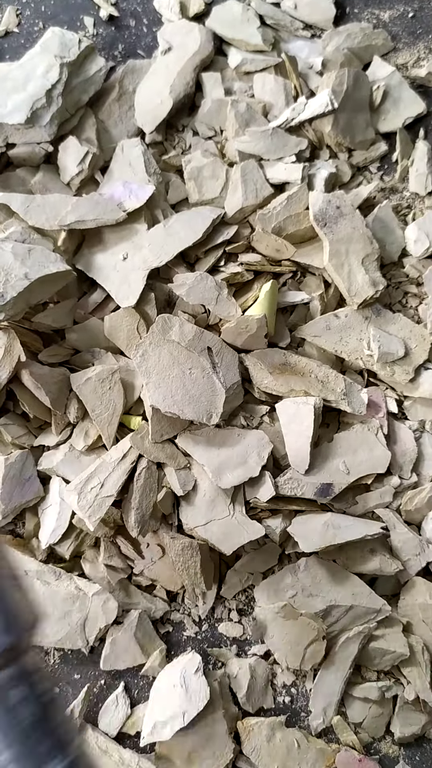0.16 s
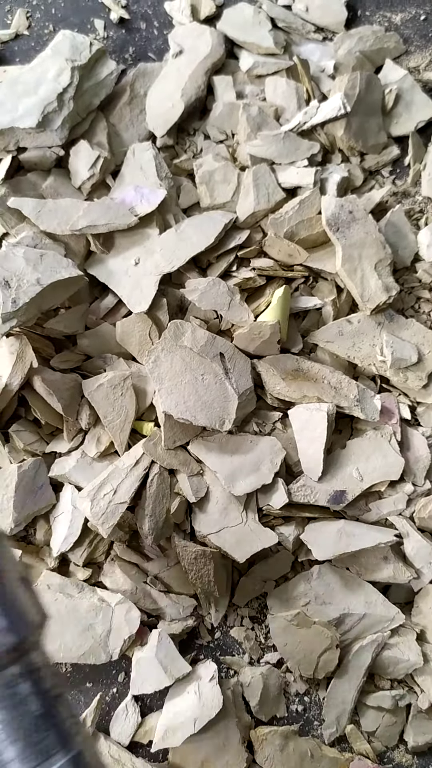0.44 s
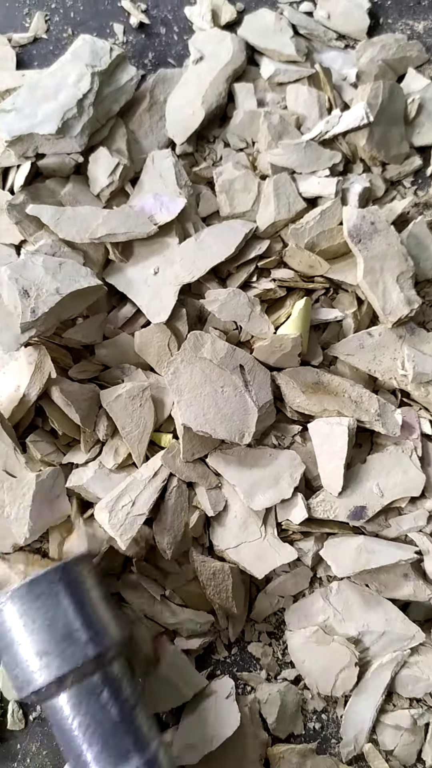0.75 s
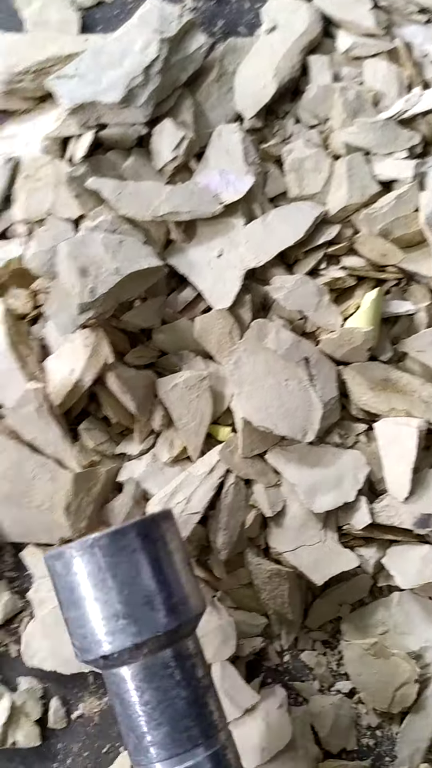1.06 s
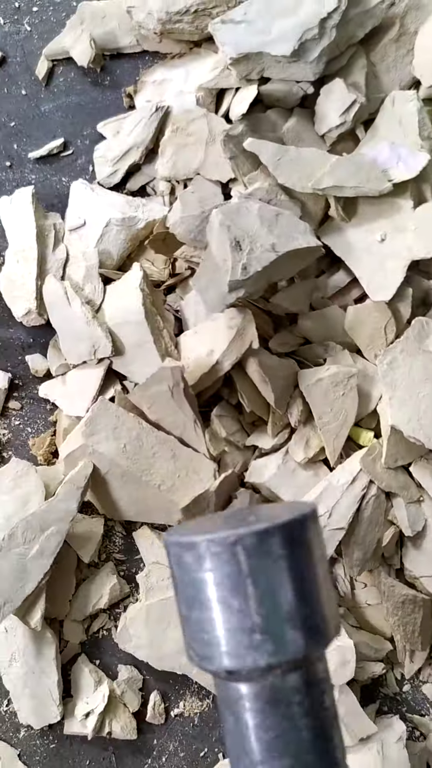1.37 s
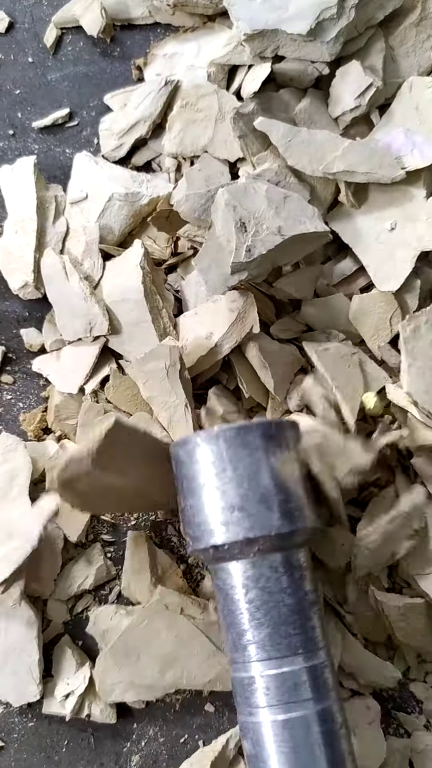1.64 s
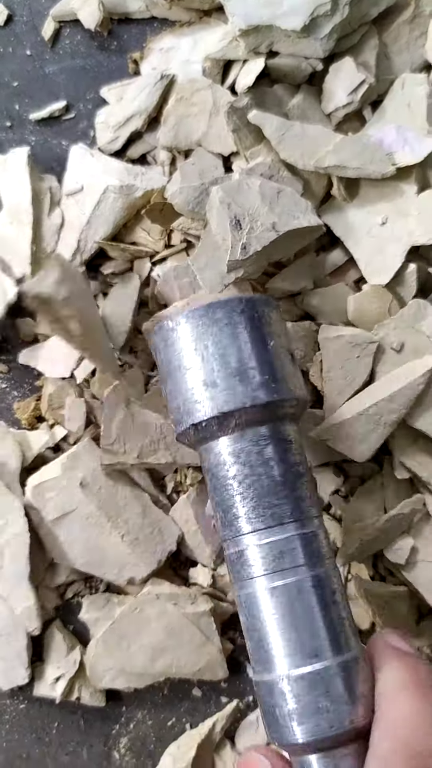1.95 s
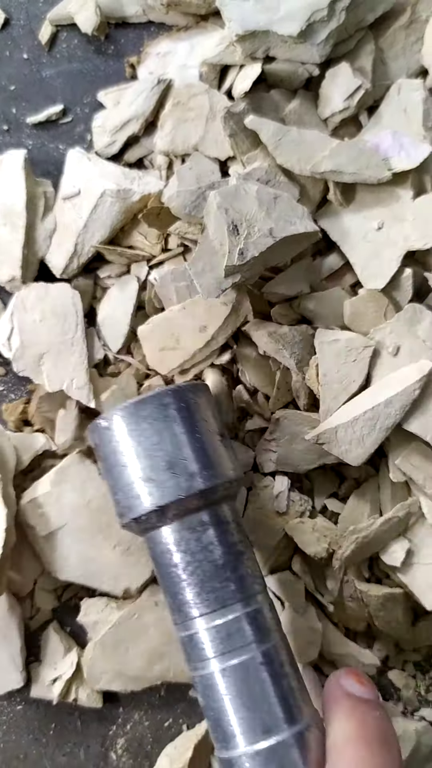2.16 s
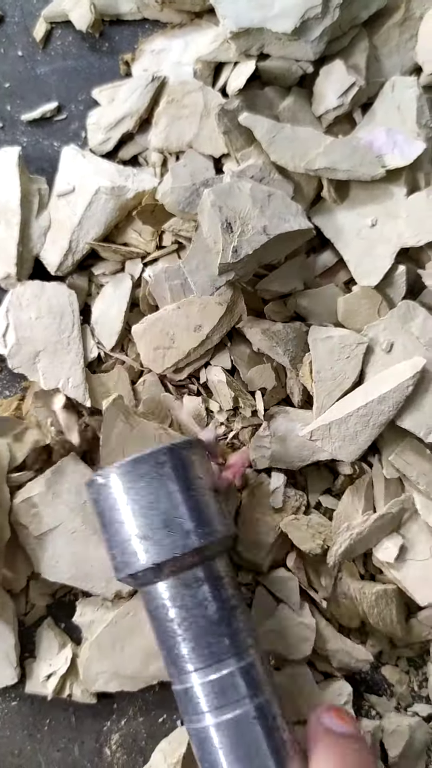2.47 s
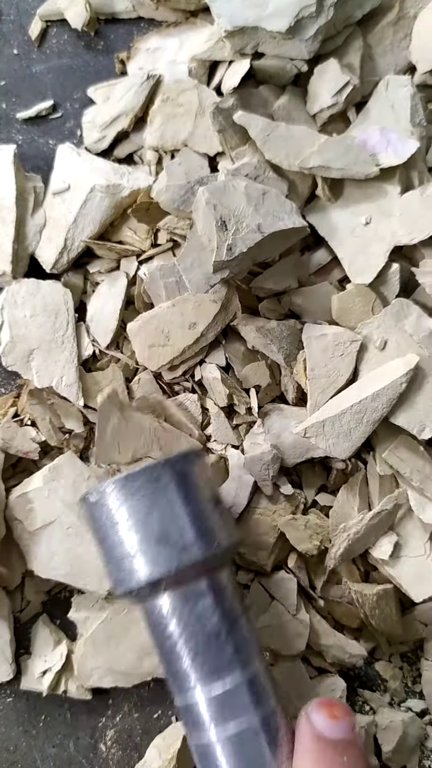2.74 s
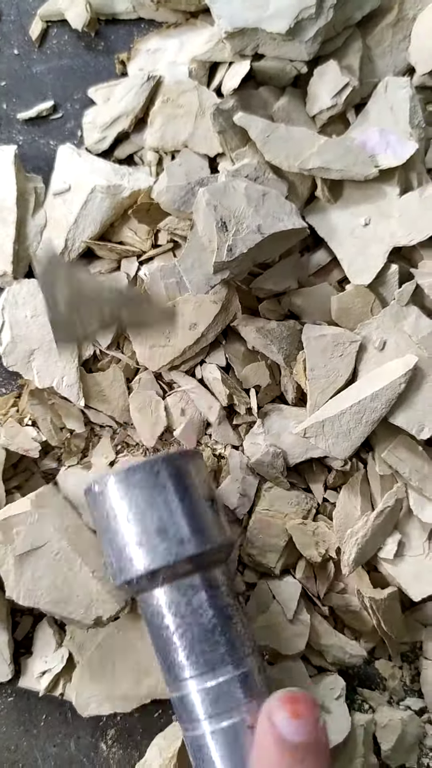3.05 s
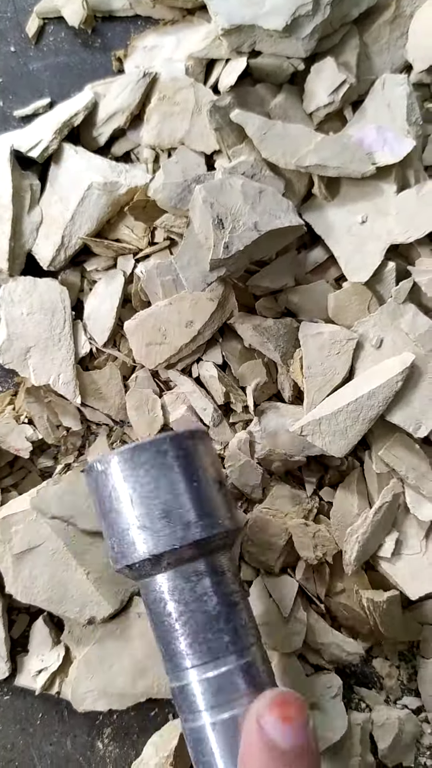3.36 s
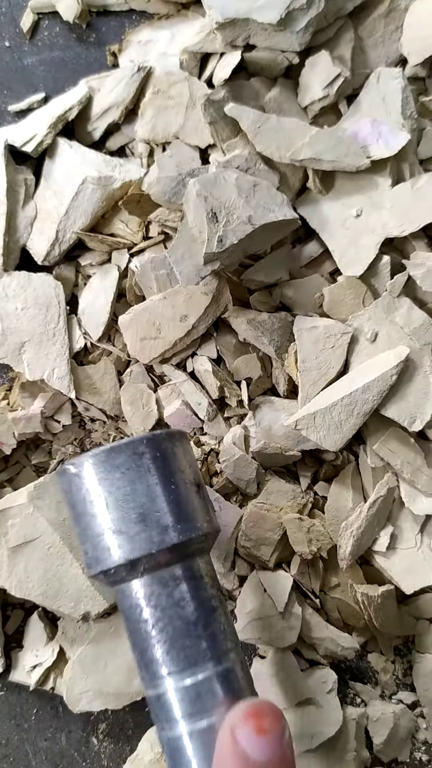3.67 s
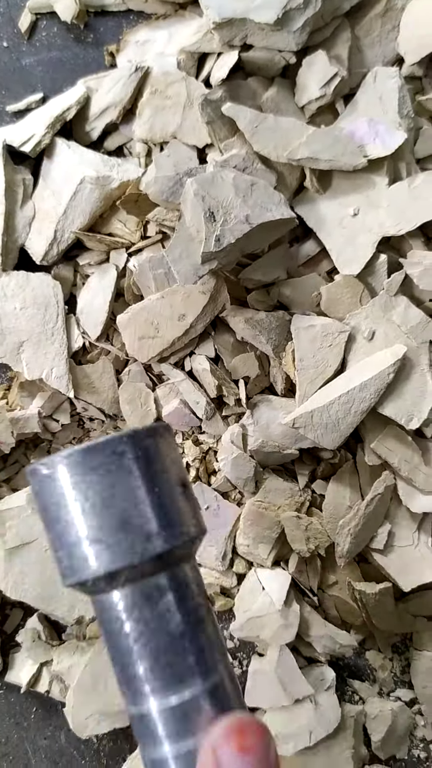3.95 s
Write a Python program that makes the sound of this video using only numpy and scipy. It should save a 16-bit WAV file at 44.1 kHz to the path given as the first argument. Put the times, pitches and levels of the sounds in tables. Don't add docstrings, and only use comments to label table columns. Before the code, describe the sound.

A steel bar cracks dry clay chunks in separate sharp blows, snaps and crumbling patter, close up, over wind puffs, low traffic rumble and faint motor whine.

```python
import sys
import numpy as np
from scipy import signal
from scipy.fft import rfft, irfft
from scipy.io import wavfile
from scipy.ndimage import uniform_filter1d

SR = 44100
rng = np.random.default_rng(int(sys.argv[2]) if len(sys.argv) > 2 else 0)


def inscribe(sig):
    pcm = np.round(np.clip(np.atleast_2d(sig).T, -1, 1) * 32767)
    wavfile.write(sys.argv[1], SR, pcm.astype(np.int16))


def makeup_ratio(level_db):
    decades = np.asarray(level_db, float) / 20
    return 10 ** decades


N = 309582
T = np.arange(N) / SR
SIDES = np.array([[.5], [-.5]])
ONSET_DELAY_S = .0008


def unit(x):
    return x / np.sqrt(np.mean(x ** 2))


def peak_unit(x):
    return x / np.abs(x).max()


def colour(x, points):
    hz, db = np.transpose(points)
    f = np.maximum(np.fft.rfftfreq(x.shape[-1], 1 / SR), 1)
    gain_db = np.interp(np.log(f), np.log(hz), db, left=-90, right=-90)
    return irfft(rfft(x) * makeup_ratio(gain_db), x.shape[-1])


def walk(rate):
    k = int(SR / rate)
    steps = np.repeat(rng.standard_normal(N // k + 1), k)
    return unit(uniform_filter1d(uniform_filter1d(steps, k), k)[:N])


def band(x, hz, width_hz):
    return signal.lfilter(*signal.iirpeak(min(hz, SR / 3), hz / width_hz, fs=SR), x)


def dull(x, hz):
    return signal.sosfilt(signal.butter(6, hz, fs=SR, output="sos"), x)


def ring(modes, t, chance, scatter_db, detune, spread):
    hz, db, t60 = np.transpose(modes)[:, :, None]
    size, tune, turn = chance[:, :len(modes), None]
    phase = 2 * np.pi * hz * (1 + detune * tune) * np.maximum(t, 0)[:, None]
    phase = phase + spread * turn * SIDES[:, None]
    fade = makeup_ratio(db + scatter_db * size - 60 * t[:, None] / t60) * np.clip(t[:, None] * hz, 0, 1)
    return peak_unit(np.sum(-fade * np.sin(phase), axis=1))


def add(out, s, y):
    i = int(s * SR)
    out[:, i:i + y.shape[1]] += y[:, :N - i]


# pitch_hz, level_db, t60_s
BAR_MODES = [(2908, 0, .045), (2944, -2, .045), (2930, -23, .25), (4600, -12, .012), (8108, -21, .04),
             (8160, -35, .15)]


def steel(t, chance):
    left_later_s = -.00003
    return ring(BAR_MODES, t - .00047 - left_later_s * SIDES, chance, scatter_db=1.2, detune=.0006, spread=.4)


def contact(t, ring_db, knock_db):
    knock_hz = 2166 + 19 * (ring_db - knock_db)
    fade = np.clip(t / 0.00045, 0, 1) * makeup_ratio(-60 * t / 0.0054)
    push = 0.54 * np.sin(np.pi * np.clip(t / 0.00058, 0, 1)) ** 2
    knock = -np.sin(2 * np.pi * knock_hz * t) * fade - push
    hollow = np.sin(2 * np.pi * 1178 * t) * makeup_ratio(-18.5 - 60 * t / 0.034)
    left_minus_right_db = 5
    return makeup_ratio(left_minus_right_db * SIDES) * dull(knock, 3320) + hollow


def heap_rattle(t):
    shaken = rng.standard_normal(len(t)) + 1.4 * rng.standard_normal((2, len(t)))
    fade = makeup_ratio(-60 * t / 0.015) + makeup_ratio(-27 - 60 * t / 0.31)
    shaken = shaken * np.clip(t / 0.0052, 0, 1) * fade
    return peak_unit(dull(band(shaken, 760, 1200) + 0.32 * band(shaken, 1020, 72), 2370))


# pitch_hz, level_db, t60_s
FLOOR_MODES = [(159.5, -4.5, 0.093), (190, -1, 0.12), (254.7, 0.5, 0.06), (304.3, -13.5, 0.15),
               (417, -10, 0.073), (486, 0.5, 0.015)]


def floor(t, chance):
    return -ring(FLOOR_MODES, t - .0008 + 0 * SIDES, chance, scatter_db=2.0, detune=0.032, spread=0.35)


# start_s, bar_ring_db, chunk_knock_db, floor_thud_db
BLOW_EVENTS = [(0.0362, -17, -35.5, -25.5), (0.2984, -23, -33.5, -24.5), (0.5645, -31, -34, -22.5),
               (0.595, -41, -48, -50), (0.8227, -30, -33.5, -26.5), (1.076, -24.5, -21, -19.5),
               (1.3444, -24.5, -38, -23.5), (1.677, -39.5, -50.5, -39), (1.954, -40, -56, -58),
               (2.249, -30.5, -41, -31.5), (2.5373, -27, -39.5, -33), (2.824, -28.5, -24, -19),
               (2.854, -38, -37, -42), (3.0905, -27.5, -22.5, -20.5), (3.3619, -32.5, -25.5, -22.5),
               (3.648, -25.5, -27.5, -21.5), (3.9346, -34, -21, -20), (4.2157, -8.5, -10.5, -21.5),
               (4.4954, -18.5, -11.5, -18.5), (4.5129, -36, -26.5, -24.5), (5.1302, -12, -6.5, -18.5),
               (5.681, -36, -20.5, -24.5), (5.6891, -38, -23, -22.5), (6.202, -14.5, -17.5, -21),
               (6.4862, -52, -34.5, -46), (6.5196, -42, -44, -48), (6.7593, -40.5, -42, -36)]


def blows():
    out, t = np.zeros((2, N)), np.arange(SR // 3) / SR - ONSET_DELAY_S
    chances = rng.standard_normal((len(BLOW_EVENTS), 2, 3, 6))
    for (start_s, ring_db, knock_db, thud_db), chance in zip(BLOW_EVENTS, chances):
        bar = makeup_ratio(ring_db + 6) * steel(t, chance[0])
        chunk = makeup_ratio(knock_db + 13.5) * contact(np.maximum(t, 0), ring_db, knock_db)
        rattle = (0.21 * makeup_ratio(knock_db + 12.5) + makeup_ratio(thud_db - 13)) * heap_rattle(t)
        thud = makeup_ratio(thud_db + 5.0) * floor(t, chance[1])
        add(out, start_s, bar + chunk + rattle + thud)
    return out


def tearing(t, grit, pitch_hz, top_db):
    tear_s = .007 + .013 * min(makeup_ratio(top_db), .6)
    burst = grit * np.clip(t / .0005, 0, 1) ** 2 * makeup_ratio(-60 * t / tear_s)
    body = band(burst, pitch_hz, 0.14 * pitch_hz) + 0.68 * band(burst, 4500, 2800)
    top = band(band(burst, 8900, 8800), 10400, 7900)
    return peak_unit(body) + makeup_ratio(top_db - 0.5) * peak_unit(top)


def crumbs(t, grit, pitch_hz, top_db):
    ticks = (rng.random(len(t)) < 1500 / SR) * makeup_ratio(0.84 * rng.exponential(size=len(t)))
    clusters = signal.lfilter([1], [1, -.97], ticks)
    patter = unit((clusters + 2.1) * grit)
    dust = dull(band(patter, 5900, 4400), 8400)
    dust = dust + 2.0 * band(patter, pitch_hz, 0.14 * pitch_hz)
    dust = dust + makeup_ratio(top_db + 5) * band(band(patter, 10500, 4600), 10500, 4600)
    return dull(dull(dust, 14800), 14800) * np.clip(t / 0.0025, 0, 1) * makeup_ratio(-60 * t / 0.33)


# start_s, peak_db, pitch_hz, top_db, crumbs_db (both against the snap)
SNAP_EVENTS = [(0.0379, -1.5, 3700, -5.5, -36.5), (0.2979, -11, 4200, 4.5, -30),
               (0.5635, -23, 5950, -4, -24), (0.597, -24.5, 3590, -36, -21), (0.822, -17, 4930, -2, -37),
               (1.0762, -3.5, 7330, -44, -49), (1.3439, -7.5, 6360, -38, -46), (1.678, -24, 5200, -9, -17),
               (1.9522, -21.5, 5300, -5, -30), (2.2498, -18, 8450, -9, -32), (2.5366, -10, 5400, -8.5, -34),
               (2.823, -13.5, 6560, -0.5, -46), (2.8548, -18, 5770, -36, -26), (3.0903, 1, 6270, -6.5, -31),
               (3.3615, -9, 7660, -7, -36), (3.648, -20, 7900, -7, -42), (3.9343, -3, 6350, -40, -35),
               (4.215, -11, 8200, -19, -48), (4.4944, -27, 4500, 3, -28), (5.1305, -1.5, 6200, -39, -26),
               (5.68, -2, 4200, -0.5, -24.5), (6.1998, -5.5, 5800, -42, -26.5),
               (6.7579, -27, 4870, -5, -24)]
# start_s, peak_db, pitch_hz, top_db (against the peak)
CHIP_EVENTS = [
    (0.1524, -33, 3600, 2.5),
    (0.2234, -30.5, 3540, 1.5),
    (0.3134, -35, 7280, -13),
    (2.02, -30.5, 5240, -6),
    (2.0538, -29.5, 3310, -34),
    (2.131, -33, 5220, 1),
    (2.8634, -28, 5220, -18),
    (3.268, -31, 3320, -26),
    (4.0613, -34, 5210, -9),
    (6.9328, -33.5, 5000, -29),
]


def clay():
    out, t = np.zeros((2, N)), np.arange(SR // 3) / SR
    left_later = 13
    left_minus_right_db, chip_crumbs_db = 1, -22
    chips = [(*chip, chip_crumbs_db) for chip in CHIP_EVENTS]
    for start_s, peak_db, pitch_hz, top_db, crumbs_db in sorted(SNAP_EVENTS + chips):
        common, own = rng.standard_normal(len(t)), rng.standard_normal((2, len(t)))
        uneven = makeup_ratio(1.63 * rng.exponential(size=len(t)))
        shared = common * uneven
        grit = np.array([np.roll(shared, left_later), shared]) + 1.48 * own * uneven
        snap = tearing(t, grit, pitch_hz, top_db)
        fall = makeup_ratio(crumbs_db) * crumbs(t, grit, pitch_hz, top_db)
        add(out, start_s + ONSET_DELAY_S, makeup_ratio(peak_db + left_minus_right_db * SIDES) * (snap + fall))
    return out


def heap_scatter(near):
    t = np.arange(SR // 5) / SR
    echo = dull(rng.standard_normal((2, len(t))), 8100)
    echo = echo * makeup_ratio(-47.0 - 60 * t / 0.27) * np.clip(t / 0.0036, 0, 1)
    return signal.fftconvolve(near, echo, axes=1)[:, :N]


# pitch_hz, width_hz, level_db
PORT_RESONANCE = (6280, 1780, 7.6)


def port(near):
    pitch_hz, width_hz, level_db = PORT_RESONANCE
    return near + (makeup_ratio(level_db) - 1) * band(near, pitch_hz, width_hz)


# start_s, peak_db, left_minus_right_db
BUFFET_EVENTS = [(0.28, -20, 17), (0.292, -22.5, 21), (0.37, -26, 24), (0.401, -22, 25), (0.446, -24.5, 31),
                 (2.469, -29, 17), (3.546, -27.5, 22.5), (5.25, -31, 9), (5.463, -29, 20),
                 (6.387, -22.5, 7), (6.45, -42, 8)]


def buffets():
    out, t = np.zeros((2, N)), np.arange(SR // 10) / SR
    chances = rng.standard_normal((len(BUFFET_EVENTS), 2))
    for (start_s, peak_db, pan_db), (sign, size) in zip(BUFFET_EVENTS, chances):
        swing = np.sin(2 * np.pi * 170 * makeup_ratio(2 * size) * t ** 0.913 * 0.6) * makeup_ratio(-60 * t / 0.027)
        add(out, start_s, np.sign(sign) * makeup_ratio(peak_db + 3.0 + pan_db * SIDES) * swing)
    return out


def gusts(table):
    calm_db, slope_db_per_s = -47., 121
    db = np.full(N, calm_db)
    for middle_s, peak_db, hold_s in table:
        outside_s = np.maximum(np.abs(T - middle_s) - hold_s / 2, 0)
        db = np.maximum(db, peak_db - slope_db_per_s * outside_s)
    return db


# pitch_hz, level_db (per Hz)
WIND_SPECTRUM = [(34, -26), (52, 1), (80, 1.5), (150, -6.5), (250, -14.5), (450, -25.5), (900, -82)]
# middle_s, peak_db, hold_s
GUSTS_LEFT = [(.3, -24.5, 0.27), (.56, -29, 0.15), (.8, -29, .03), (1.2, -37, .02), (1.4, -32, .03),
              (2.02, -27.5, 0.039), (2.49, -19, 0.037), (2.9, -27.5, 0.024), (3.1, -23, .02),
              (3.46, -28.5, 0.18), (4.1, -33.5, 0.28), (4.8, -35, .02), (5.21, -18.5, 0.035),
              (5.5, -21, 0.025), (5.7, -20.5, 0.035), (6.0, -31, .02), (6.2, -24.5, 0.022),
              (6.44, -22.5, 0.062), (6.7, -31.5, .02)]
# middle_s, peak_db, hold_s
GUSTS_RIGHT = [(.1, -32, 0.024), (.3, -29, .03), (.82, -25.5, 0.1), (1.2, -38, .02), (1.88, -30.5, 0.1),
               (2.1, -31.5, .02), (2.45, -32.5, .1), (2.7, -34, .02), (3.1, -25, 0.11), (4.1, -41, .02),
               (4.4, -31, .05), (5.1, -43, 0.027), (5.7, -28.5, 0.064), (6.1, -38, .05), (6.39, -27, .03),
               (6.7, -32, 0.016), (6.95, -35, 0.085)]


def wind():
    puffs = rng.standard_normal((2, N)) * makeup_ratio(3.85 * np.array([walk(40), walk(40)]))
    level_db = np.array([gusts(GUSTS_LEFT), gusts(GUSTS_RIGHT)]) - 3.0
    return unit(colour(puffs, WIND_SPECTRUM)) * makeup_ratio(level_db)


# pitch_hz, level_db (per Hz)
RUMBLE_SPECTRUM = [(15, -64), (25, -31), (61, 0), (81, -2), (123, -6.5), (161, -0.5), (210, -17),
                   (305, -19.5), (343, -22), (466, -27), (600, -59.5), (780, -29), (1320, -120)]
# time_s, level_db
TRAFFIC_LEVEL = [
    (0, -35.5),
    (.5, -38),
    (1.1, -35.5),
    (2.6, -38),
    (3.5, -37),
    (5.2, -39),
    (6.05, -41),
    (7.02, -38),
]


def traffic():
    noise = rng.standard_normal(N) + 0.3 * rng.standard_normal((2, N))
    level_db = np.interp(T, *np.transpose(TRAFFIC_LEVEL)) + 4.0 + 1.7 * SIDES
    return unit(colour(noise, RUMBLE_SPECTRUM)) * makeup_ratio(level_db)


# pitch_hz, level_db (rms)
MOTOR_LINES = [(807, -64), (1992, -64), (2083, -63), (2180, -55), (4075, -68), (4646, -67), (4834, -67),
               (5071, -64), (5164, -64), (5211, -61)]


def motor():
    whine = np.zeros((2, N))
    for pitch_hz, level_db in MOTOR_LINES:
        phase = 2 * np.pi * (pitch_hz * T + .06 * walk(4) + SIDES / 4)
        whine += makeup_ratio(level_db + 4.5 + 1.5 * walk(9)) * np.sin(phase)
    return whine


# multiple, level_db (rms)
HORN_OVERTONES = [(1, -50.5), (7, -60), (8, -47.5), (9, -47), (11, -56)]
# time_s, pitch_hz, level_db
HORN_CALL = [
    (.12, 392.5, -4),
    (.15, 391, -1),
    (.45, 390.6, -1),
    (.78, 397.5, -3.5),
    (.83, 392, -7),
]


def horn():
    time_s, pitch_hz, call_db = np.transpose(HORN_CALL)
    phase = 2 * np.pi * np.cumsum(np.interp(T, time_s, pitch_hz) + 1.13 * walk(30)) / SR
    tone = np.zeros((2, N))
    for k, level_db in HORN_OVERTONES:
        waver_db = 2.2 * walk(45) + 3.2 * np.sin(2 * np.pi * 33 * T + k)
        tone += makeup_ratio(level_db + 4.5 + waver_db) * np.sin(k * (phase + 0.2 * SIDES))
    return tone * makeup_ratio(np.interp(T, time_s, call_db, left=-99, right=-99))


# pitch_hz, level_db (per Hz)
HISS_SPECTRUM = [(290, -15), (500, -6), (746, -1.5), (790, 0.5), (1250, -5.5), (1380, -3), (1640, -5.5),
                 (2150, -3), (2440, -5.5), (3390, -4.5), (4450, -6.5), (5060, -5), (6640, -16.5),
                 (12600, -25.5), (15200, -25.5)]


def yard_hiss():
    level_db = -46.4 + 1.5 + 0.78 * walk(9.4) + 2.7 * SIDES
    return unit(colour(rng.standard_normal((2, N)), HISS_SPECTRUM)) * makeup_ratio(level_db)


def scene():
    near = blows() + clay()
    near = port(near + heap_scatter(near))
    return near + buffets() + wind() + traffic() + motor() + horn() + yard_hiss()


def top_cut(x):
    return signal.sosfilt(signal.butter(12, 17040, fs=SR, output="sos"), x)


def record(dry):
    bass = signal.butter(2, 42, "high", fs=SR, output="sos")
    top = signal.ellip(6, .5, 60, 16000, fs=SR, output="sos")
    rounded = np.tanh(1.5 * signal.sosfilt(bass, dry)) / 1.37
    mix = signal.sosfilt(top, rounded)
    return top_cut(mix)


dry = scene()
out = record(dry)
inscribe(out)
```